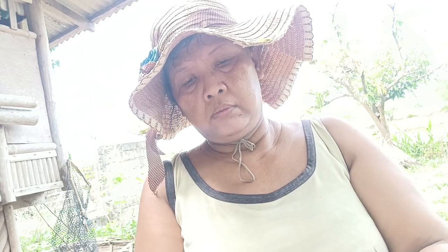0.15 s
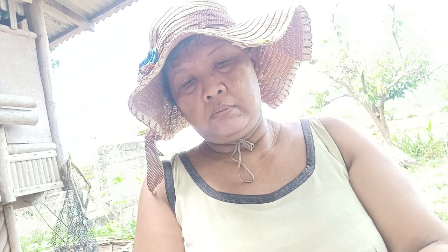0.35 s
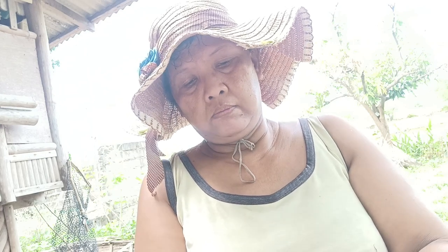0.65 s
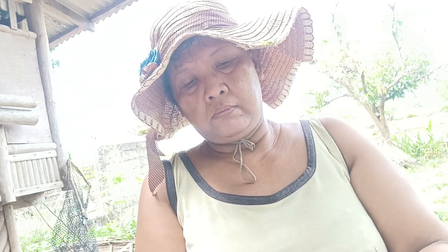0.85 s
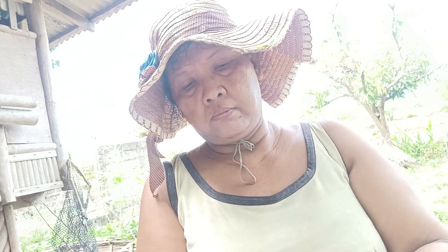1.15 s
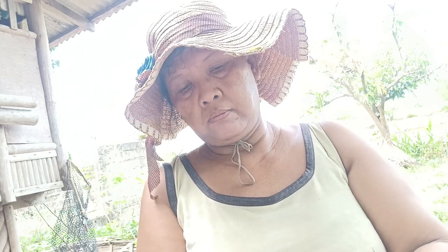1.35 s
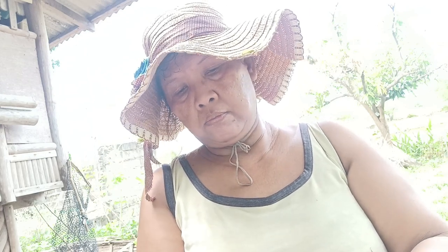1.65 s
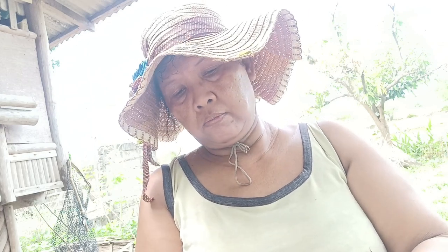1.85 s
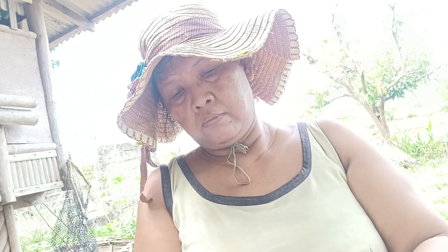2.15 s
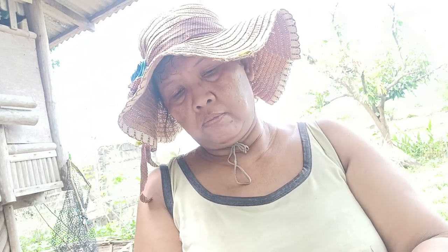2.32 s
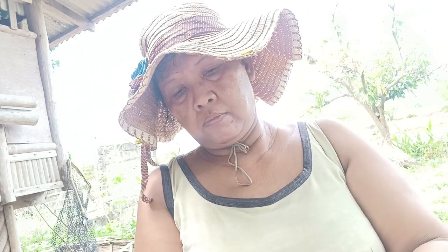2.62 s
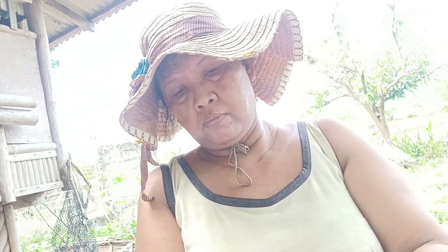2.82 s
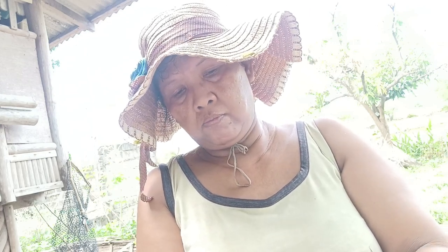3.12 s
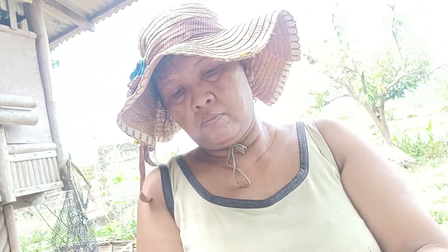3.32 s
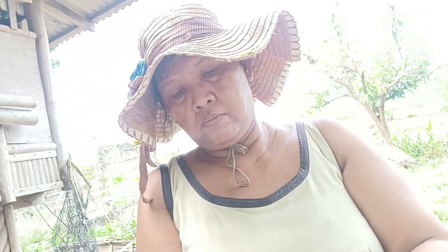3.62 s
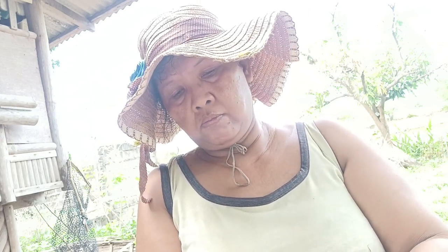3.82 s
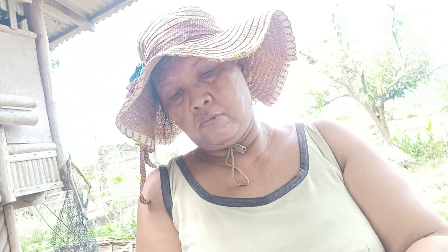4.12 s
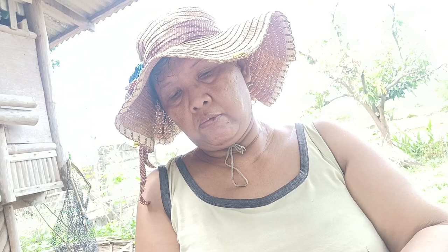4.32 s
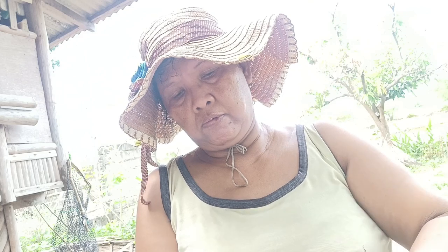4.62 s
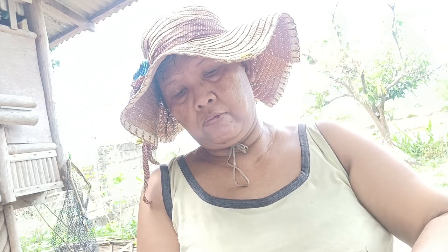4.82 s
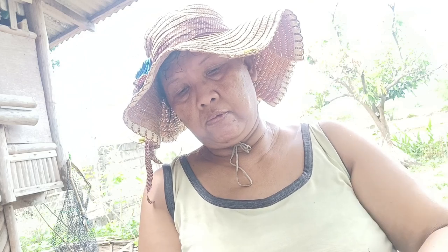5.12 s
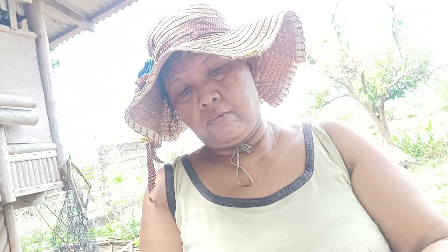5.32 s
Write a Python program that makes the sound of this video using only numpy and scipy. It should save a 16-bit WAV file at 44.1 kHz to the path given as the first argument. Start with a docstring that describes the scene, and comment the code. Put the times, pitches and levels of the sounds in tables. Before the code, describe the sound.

Brittle husk cracks and rustles in irregular bursts over soft handling thumps and small bird chirps, then a motor-like drone sets in.

```python
"""Picking apart a dry seed pod

Close to a hand-held phone, under a porch roof, a dry husk snaps, crackles and rustles: bursts of noise ring
three resonant voices, the hollow body, the cracking wall and its fine splinters. The arms jostle the phone in
bass noise, small birds call in gliding sines over the faint air and rough tones of the garden, and near the
end a low throbbing hum, like a motor, sets in: a wavering sine under a band of rough noise."""
import sys
import numpy as np
from scipy import signal
from scipy.fft import rfft, irfft, next_fast_len
from scipy.io import wavfile
from scipy.ndimage import uniform_filter1d, map_coordinates

SR = 44100
rng = np.random.default_rng(int(sys.argv[2]) if len(sys.argv) > 2 else 0)


def to_wav(sig):
    """Store sig (one row per channel, or 1-D mono) as 16-bit WAV at the path in sys.argv[1].

    Samples outside -1..1 are clipped; the rate is SR.
    """
    pcm = np.clip(np.atleast_2d(sig), -1, 1) * 32767
    pcm = np.round(pcm).astype(np.int16)
    wavfile.write(sys.argv[1], SR, pcm.T)  # frames by channels


N = 240653

# Spectra of the three voices of the husk: hollow body, cracking wall, fine splinters.
# Each row: frequency in Hz, relative level in dB.
BODY_SPECTRUM = [(100, -40), (400, -29.5), (1100, -28), (1500, -22), (1720, -1), (2000, 6.5), (2400, 4.5),
                 (3200, -1), (4500, -6), (8000, -91.5)]
CRACK_SPECTRUM = [(300, -84), (1450, -28), (1800, -10), (2600, -10.5), (3400, 4), (4300, 1.5), (5200, 8.5),
                  (6500, 0.5), (8000, -8.5), (11000, -33.5)]
SPLINTER_SPECTRUM = [(500, -108), (5000, -19.5), (8000, -7.5), (9800, 4.5), (12000, 8), (13500, 4),
                     (15300, -0.5), (17000, -15)]


def amp(db):
    """Decibels to an amplitude ratio: 20 dB is a factor of ten."""
    return 10 ** (np.asarray(db) / 20)


def unit(x):
    """Normalization to a root mean square of 1."""
    return x / np.sqrt(np.mean(x ** 2) + 1e-20)


def along(points, hz):
    """Interpolation of (Hz, value) points on a logarithmic frequency axis."""
    f, v = np.transpose(points)
    return np.interp(np.log(hz + 1), np.log(f + 1), v)


def curves(rows):
    """Linear interpolation in time: one value per sample for each column after the time."""
    s, *cols = np.transpose(rows)
    return [np.interp(np.arange(N) / SR, s, c) for c in cols]


def wobble(rate, size=N):
    """Band-limited randomness: a smooth curve through random knots, rate of them a second."""
    knots = rng.standard_normal(int(size * rate / SR) + 4)
    return map_coordinates(knots, [np.arange(size) * rate / SR])


def filtered(x, response):
    """Linear filtering: the spectrum of x times a response of frequency."""
    m = next_fast_len(N + SR // 2)
    return irfft(rfft(x, m) * response(np.fft.rfftfreq(m, 1 / SR)), m)[..., :N]


def causal(spectrum, ripple_db=0, size=1024):
    """Minimum phase: an impulse response of this colour, with random resonances and energy 1."""
    hz = np.fft.rfftfreq(size, 1 / SR)
    ripple = map_coordinates(rng.standard_normal(size), [hz / 330])  # one knot every 330 Hz
    cepstrum = irfft(np.log(amp(along(spectrum, hz) + ripple_db * ripple)))
    # folding the cepstrum onto positive times puts the energy as early as it can be
    cepstrum[1:size // 2] *= 2
    cepstrum[size // 2 + 1:] = 0
    h = irfft(np.exp(rfft(cepstrum)))
    return h / np.linalg.norm(h)


def pair(size, apart):
    """Partial coherence: noise at two microphones; apart is the share they do not have in common."""
    common, left, right = rng.standard_normal((3, size))
    return np.sqrt(1 - apart) * common + np.sqrt(apart) * np.array([left, right])


def noise(spectrum, apart):
    """Spectral shaping: coloured stereo noise of rms 1."""
    return unit(filtered(pair(N, apart), lambda hz: amp(along(spectrum, hz))))


def panned(db):
    """Level difference between the microphones: left minus right in dB."""
    return amp([[db / 2], [-db / 2]])


def add(track, s, x):
    """Superposition: mix x into track from time s in seconds."""
    i = max(round(s * SR), 0)
    part = track[:, i:i + x.shape[-1]]
    part += x[..., :part.shape[1]]


def heard(voice, ripple_db):
    """Transfer paths: one voice as it reaches the two microphones, each with its own resonances."""
    return np.array([causal(voice, ripple_db), causal(voice, ripple_db)])


def snaps(spike_db=10, spike_s=0.00036, click_db=2, lead_db=-9, lead_s=0.002, spread_s=.00005,
          ripple_db=3, crumble_t60_s=.024, size=2048):
    """Brittle fracture: fibres give way, the wall breaks in a sharp burst, the edges crumble for a few ms."""
    # Fractures of the husk. Each row: time in seconds, then relative levels of body, crack and splinters in dB.
    fractures = [(0.3547, -37, -46.5, -35), (0.362, -25.5, -15.5, -18), (0.3977, -52.5, -39, -33),
                 (0.4271, -23.5, -16.5, -20.5), (0.4322, -27.5, -16, -13.5), (0.4664, -37, -25, -27),
                 (0.6145, -21, -20, -32), (0.6355, -32, -37, -29), (0.6532, -51.5, -29, -28),
                 (0.6819, -36.5, -30, -12.5), (0.9734, -24, -28, -44), (1.0626, -44, -23.5, -21.5),
                 (1.1, -38.5, -30.5, -19.5), (1.3496, -38.5, -37, -27.5), (1.6227, -53, -27.5, -24.5),
                 (1.8899, -34.5, -34.5, -32.5), (1.944, -49.5, -47, -32), (1.9846, -42, -54, -22),
                 (1.9879, -60, -23.5, -17.5), (2.042, -41, -51, -30.5), (2.0878, -29.5, -40, -28),
                 (2.1313, -27, -23, -25), (2.51, -63, -39.5, -35), (2.7682, -40.5, -63, -25.5),
                 (2.775, -52.5, -33.5, -29.5), (2.8087, -43, -33.5, -40.5), (2.9158, -37, -27, -22.5),
                 (2.922, -48.5, -31, -16.5), (2.9384, -32.5, -37, -32.5), (2.9448, -29.5, -59, -35.5),
                 (2.9618, -47, -41, -25.5), (2.9867, -30, -22.5, -24), (3.0058, -40, -35.5, -35),
                 (3.032, -74, -29.5, -26.5), (3.0872, -25.5, -15.5, -16), (3.1487, -58.5, -31.5, -22),
                 (3.233, -66, -44, -24), (3.8477, -40, -42, -54), (4.3609, -15, -17, -21.5),
                 (4.519, -27.5, -33, -72), (4.551, -18, -22, -30.5), (4.5539, -22, -16.5, -22),
                 (4.561, -17.5, -22.5, -29), (4.684, -35, -29.5, -48), (4.7352, -17.5, -20.5, -27),
                 (4.746, -19.5, -23.5, -33), (4.917, -15, -18, -27.5), (4.9205, -19.5, -24.5, -37),
                 (4.929, -20.5, -28, -25.5), (5.0249, -29.5, -36, -49)]
    body_peak_hz = 1860
    out, lead = np.zeros((2, N)), size // 4
    t = (np.arange(size) - lead) / SR
    core = (t > -.001) & (t < .002)  # the span over which the levels hold
    hz = np.fft.rfftfreq(size, 1 / SR)
    giving_way = amp(lead_db) * np.exp(-np.abs(t) / lead_s)
    crumble = np.where(t < 0, giving_way, amp(-60 * np.abs(t) / crumble_t60_s))
    spike = np.exp(-(t / spike_s - 1) ** 2)
    for s, *levels in fractures:
        # bright splinters part cleanly, deep breaks crunch
        sharpness_db = spike_db + 0.53 * (levels[-1] - levels[0])
        force = (crumble + amp(sharpness_db) * spike) * pair(size, apart=0.41)
        # the place of the break sets which microphone hears it first, and which resonances ring
        delay = rng.normal(1, 1) * spread_s * np.array([[-.5], [.5]])
        force = rfft(force) * np.exp(-2j * np.pi * hz * delay)
        # a heavy break sets more of the pod moving, so its body rings down to a lower edge
        lower = np.interp(levels[0], [-32, -22], [1, .77])
        body = [(f * lower if f < body_peak_hz else f, db) for f, db in BODY_SPECTRUM]
        voices = body, CRACK_SPECTRUM, SPLINTER_SPECTRUM
        rings = [irfft(force * rfft(heard(voice, ripple_db), size)) for voice in voices]
        snap = sum(amp(db) * r / np.sqrt(np.mean(r[:, core] ** 2)) for db, r in zip(levels, rings))
        # the sharpest snaps overload the phone: one bare click reaching down into the bass,
        # as strong as the splinters are loud and so faint in the duller snaps
        snap[:, lead] += amp(levels[-1] + click_db)
        add(out, s - lead / SR, snap)
    return out


def ringing(x, t60=0.22, width_hz=130):
    """Cavity resonance: the hollow pod rings on in a few blurred modes."""
    # Modes that ring on after a break. Each row: frequency in Hz, relative level in dB.
    modes = [(2110, 6), (2400, 4), (3220, 3), (3540, -13.5)]
    t = np.arange(SR // 2) / SR
    ring = 0
    for hz, db in modes:
        ring = ring + amp(db) * wobble(width_hz, size=len(t)) * np.sin(2 * np.pi * hz * t)
    ring = ring * amp(-60 * t / t60)
    return signal.fftconvolve(x, ring[None] / np.linalg.norm(ring), axes=1)[:, :N]


def stroke(peak_s, length, rise_share=0.52, ends_db=22):
    """Amplitude envelope of one movement: it swells to its peak and fades to ends ends_db below it."""
    u = (np.arange(N) / SR - peak_s) / length
    near, gain = np.abs(u) < 2, np.zeros(N)
    from_peak = np.maximum(-u[near] / rise_share, u[near] / (1 - rise_share))
    gain[near] = amp(-ends_db * from_peak ** 1.57)
    return gain


def tear(start_s, attack_s=0.012, decay_db_per_s=220.5):
    """Exponential decay: the gain of one tear, with a sudden start and a steady fall in dB."""
    t, gain = np.arange(SR // 2) / SR, np.zeros((1, N))
    add(gain, start_s - attack_s, np.minimum(t / attack_s, 1) * amp(-decay_db_per_s * t))
    return gain[0]


def handling():
    """Addition of powers: how hard all strokes and tears drive the body, the wall and the splinters."""
    # Strokes of the fingers over the husk. Each row: time of the peak in seconds, length in seconds,
    # relative level in dB, brightness in dB (splinters up, body down).
    finger_strokes = [(0.18, 0.14, -37, 2.5), (0.356, 0.24, -50, 11), (0.669, 0.53, -64.5, 19.5),
                      (0.919, 0.33, -50.5, 3.5), (1.17, 0.22, -36.5, 0.5), (1.185, 0.06, -31.5, -1),
                      (1.416, 0.18, -42.5, 0.5), (1.905, 0.098, -48.5, -8.5), (1.993, 0.16, -39, 3.5),
                      (2.083, 0.073, -32.5, 0.5), (2.136, 0.09, -33, -5), (2.344, 0.15, -44, -2),
                      (2.62, 0.28, -54.5, 1), (2.831, 0.19, -38, 3.5), (2.963, 0.17, -33.5, 2),
                      (3.058, 0.21, -50.5, 10), (3.18, 0.3, -56.5, 9.5), (3.42, 0.16, -46, 7.5),
                      (3.557, 0.1, -42, 0.5), (3.635, 0.19, -42.5, -5.5), (3.901, 0.14, -51, -5.5),
                      (4.184, 0.16, -45.5, 1.5), (4.346, 0.037, -40.5, -7), (4.534, 0.035, -42.5, -12.5),
                      (4.69, 0.054, -40.5, -8.5), (4.863, 0.069, -42, -7.5), (5.444, 0.042, -38, -3)]
    # The husk tears on after a break. Each row: time in seconds, relative level in dB, brightness in dB.
    husk_tears = [(0.43, -30.5, 3), (1.07, -39, 4), (1.623, -35.5, 1), (2.769, -42.5, 2),
                  (4.365, -27, -6.5), (4.555, -30, -5), (4.734, -36.5, -5), (4.92, -33.5, -8.5)]
    moves = [(stroke(s, length), db, bright_db) for s, length, db, bright_db in finger_strokes]
    moves += [(tear(s), db, bright_db) for s, db, bright_db in husk_tears]
    gains = np.array([gain for gain, _, _ in moves])
    shares = np.array([amp([db - bright_db, db, db + bright_db]) for _, db, bright_db in moves])
    return np.sqrt(shares.T ** 2 @ gains ** 2)


def rustle(scatter_db=-1.0, clump_db=2, body_db=-1.5, crack_db=-.5, splinter_db=-1, size=6144):
    """Stick-slip friction: tiny slips of husk on husk over a smooth rub; each new grip rings other resonances."""
    slips_per_s, ticks_per_s, tick_db, rub_share = 500, 70, 27, .45
    slips = (rng.random(N) < slips_per_s / SR) * amp(scatter_db * np.minimum(rng.standard_normal(N), 2))
    # the energy of a slip decays with a time constant of 0.4 ms
    slip_energy = signal.lfilter([1], [1, -np.exp(-1 / (.0004 * SR))], slips ** 2)
    grit = np.sqrt(np.abs(slip_energy))
    pressure = (unit(grit) + rub_share) * amp(clump_db * wobble(rate=98))
    fibres = rng.random(N) < ticks_per_s / SR
    out = np.zeros((2, N))
    voices = ((BODY_SPECTRUM, body_db, .45), (CRACK_SPECTRUM, crack_db, .7),
              (SPLINTER_SPECTRUM, splinter_db, .8))
    for drive, (voice, db, apart) in zip(handling(), voices):
        # now and then a single fibre snaps with a clean tick, each in its own mix of the three voices
        ticks = fibres * amp(tick_db) * np.tanh(rng.standard_normal(N))
        force = np.pad(pressure * pair(N, apart) + ticks, ((0, 0), (0, size)))
        grains = np.zeros((2, N))
        # half-overlapping windows fade from grip to grip
        for i in range(0, N, size // 2):
            grip = heard(voice, ripple_db=5.5)
            windowed = force[:, i:i + size] * np.hanning(size)
            add(grains, i / SR, signal.fftconvolve(windowed, grip, axes=1))
        out += amp(db) * drive * unit(grains)
    return out * panned(db=-3.0)


def knocks(t60=0.19, q=5.7):
    """Damped resonance: a soft contact and a brief roll ring one mode of the hollow pod."""
    # Soft knocks of the pod and its loose seeds. Each row: time in seconds, frequency in Hz, relative level in dB.
    contacts = [(0.427, 414, -46), (2.012, 614, -56.5), (3.824, 2580, -36.5), (3.893, 1865, -39.5),
                (3.968, 1990, -42.5), (4.04, 1890, -38.5), (4.111, 1910, -43), (4.149, 1920, -36),
                (4.174, 2085, -33), (4.17, 587, -49.5), (4.172, 1110, -49.5)]
    out, t = np.zeros((2, N)), np.arange(SR // 8) / SR
    for s, hz, db in contacts:
        ring = np.sin(2 * np.pi * hz * t) * t * np.exp(-np.pi * hz / q * t)
        roll = unit(signal.fftconvolve(pair(len(t), apart=0.55), ring[None], axes=1)[:, :len(t)])
        add(out, s, roll * amp(db - 60 * t / t60))
    return out * panned(db=-3.5)


def rumble(tremor_db=-52):
    """Structure-borne noise: soft shifts of the arm shake the phone, over the slight tremor of the hand."""
    # Shifts of the arm. Each row: time of the peak in seconds, length in seconds, relative level in dB.
    jostles = [(0.577, 0.057, -39), (0.863, 0.21, -42.5), (0.97, 0.24, -36), (1.721, 0.16, -42),
               (1.903, 0.18, -38), (2.245, 0.16, -37.5), (2.492, 0.55, -38), (3.357, 0.7, -41),
               (3.505, 0.62, -36.5), (3.84, 0.27, -40), (4.221, 0.2, -36)]
    # Spectrum of the shaking. Each row: frequency in Hz, relative level in dB per Hz.
    thud = [(20, -30.5), (45, -11), (68, -1), (120, -7.5), (170, -16), (230, -34), (400, -42.5),
            (900, -101)]
    shift_power = sum((amp(db) * stroke(s, length)) ** 2 for s, length, db in jostles)
    shake = np.sqrt(amp(tremor_db) ** 2 + shift_power)
    return shake * noise(thud, apart=0.029) * panned(db=-1.4)


def patchy(x, depth_db, size=512):
    """Time-frequency modulation: random patches of gain, some 260 Hz wide and a tenth of a second long."""
    z = signal.stft(x, nperseg=size)[2]
    field = uniform_filter1d(rng.standard_normal(z.shape[1:]), size=3, axis=0)
    field = uniform_filter1d(field, size=20, axis=1)
    return unit(signal.istft(z * amp(depth_db * unit(field)), nperseg=size)[1][:, :N])


def hum(pitch_hz=92, waver=0.016):
    """Amplitude modulation: a low motor-like drone throbs, with a rough, uneven band above it that grows."""
    # Spectrum of the rough band. Each row: frequency in Hz, relative level in dB per Hz.
    growl = [(60, -5), (90, 9), (115, 13.5), (160, 8), (200, -3.5), (260, -37), (450, -20), (620, -22),
             (800, -15.5), (1080, -16), (1350, -7.5), (1680, -15.5), (2500, -22.5), (3500, -17),
             (4500, -27.5), (7000, -74.5)]
    start_s, rise_s, note_db = 4.45, 0.069, -34
    throb_at_s, throb_period_s, swell_db, beat_db = 4.885, 0.263, 3, 5.5
    s = np.arange(N) / SR
    phase = 2 * np.pi * np.cumsum(pitch_hz * (1 + waver * wobble(rate=47))) / SR
    # one swell and three beats a period: two strong beats and a weaker one
    turn = 2 * np.pi * (s - throb_at_s) / throb_period_s
    throb_db = swell_db * np.cos(turn) - beat_db * np.cos(3 * turn)
    note = amp(note_db + throb_db) * unit(np.sin(phase) * amp(1.5 * wobble(rate=40)))
    rough = patchy(noise(growl, apart=0.3) * (1 + .5 * np.cos(phase)), depth_db=4.5)
    rough_db = np.interp(s, [4.5, 4.9, 5.25], [-45, -41, -38])
    onset = np.clip((s - start_s) / rise_s, 0, 1)
    return onset * (note + amp(rough_db) * rough) * panned(db=-1.0)


def birds(blur_hz=180, chirp_s=0.056, arch_octaves=0.08, whistle_db=-50):
    """Frequency modulation: arched chirps and one high whistle that rises, then falls, all with a fast flutter."""
    # Chirps of small birds. Each row: time in seconds, pitch in Hz, glide in octaves, relative level in dB.
    chirps = [(0.733, 2980, 0.17, -58.5), (1.229, 2944, 0.21, -55), (1.488, 2900, 0.16, -59),
              (1.689, 3100, -0.17, -55), (1.796, 2950, 0.14, -53.5), (2.179, 2935, 0.18, -50.5),
              (2.378, 2814, 0.1, -55.5), (2.526, 2840, 0.164, -55.5), (2.645, 3010, 0.18, -56),
              (2.466, 5000, 0.12, -51.5)]
    # Pitch of the whistle. Each row: time in seconds, pitch in Hz.
    whistle = [(2.289, 5250), (2.374, 6200), (2.409, 5860), (2.478, 4400)]
    out, flutter = np.zeros((2, N)), wobble(rate=770)
    u = np.linspace(-.5, .5, int(chirp_s * SR))
    notes = [(s, hz * 2 ** (glide * u - arch_octaves * (2 * u) ** 2), db) for s, hz, glide, db in chirps]
    start, end = whistle[0][0], whistle[-1][0]
    notes.append((start, curves(whistle)[0][int(start * SR):int(end * SR)], whistle_db))
    for s, hz, db in notes:
        pitch = hz + blur_hz * flutter[int(s * SR):][:len(hz)]
        swell = np.sqrt(np.abs(np.sin(np.linspace(0, np.pi, len(hz)))))
        add(out, s, 2 * amp(db) * swell * np.sin(2 * np.pi * np.cumsum(pitch) / SR))
    return out


def far_tones(width_hz=50):
    """Narrow-band noise: faint rough tones swell and fade far off."""
    # Rough tones of the surroundings. Each row: start in seconds, end in seconds, frequency in Hz, level in dB.
    tones = [(0, 1.09, 157.6, -52.5), (2.67, 2.898, 161.5, -46.5), (0.096, 0.226, 610, -61),
             (2.71, 2.75, 900, -56.5), (4.044, 4.15, 316.2, -56), (4.938, 5.313, 610, -51.5),
             (5.224, 5.59, 1061, -55.5), (5.279, 5.363, 3570, -58), (5.33, 5.552, 1640, -57)]
    out = np.zeros((2, N))
    for start, end, hz, db in tones:
        t = np.arange(int((end - start) * SR) + 2) / SR
        swell = np.sqrt(np.abs(np.sin(np.pi * t / t[-1])))
        width = min(width_hz, hz / 10)
        # two random quadratures spread the tone into a band
        tone = wobble(width, size=len(t)) * np.sin(2 * np.pi * hz * t)
        tone += wobble(width, size=len(t)) * np.cos(2 * np.pi * hz * t)
        add(out, start, amp(db) * swell * unit(tone))
    return out


def air():
    """Stationary random noise: the steady, coloured bed of the garden."""
    # Spectrum of the air. Each row: frequency in Hz, relative level in dB per Hz.
    air_spectrum = [(30, -32), (100, -21), (170, 8.5), (240, -7.5), (400, -14), (800, -21), (1500, -21.5),
                    (2800, -19.5), (4300, -27), (6000, -25), (8500, -25.5), (15000, -39.5)]
    return amp(-53) * noise(air_spectrum, apart=0.53)


def porch(x, gap_s=0.0088):
    """Reverberation: roof and wall answer with a short diffuse tail."""
    # Decay under the porch. Each row: frequency in Hz, time to fall by 60 dB in seconds.
    decay = [(200, 0.143), (2000, 0.18), (6000, 0.1), (14000, 0.06)]
    hz, t, z = signal.stft(rng.standard_normal((2, SR // 2)), SR, nperseg=256)
    tail = signal.istft(z * amp(-60 * t / along(decay, hz)[:, None]), SR, nperseg=256)[1]
    tail = np.pad(tail / np.linalg.norm(tail[0]), ((0, 0), (int(gap_s * SR), 0)))
    return signal.fftconvolve(x, tail, axes=1)[:, :N]


def scene():
    """Superposition: the pod close by, the garden behind it, and the bass of hand and hum."""
    # The pod at the two microphones. Each row: frequency in Hz, left minus right in dB.
    lean = [(400, 5), (1000, -4.5), (2200, -3), (5000, 4.5), (8000, -5.5), (13000, -0.5)]
    cracks = snaps()
    calls = birds()
    pod = cracks + rustle() + amp(-12.5) * porch(cracks) + amp(-27.5) * ringing(cracks) + knocks()
    pod = filtered(pod, lambda hz: amp(along(lean, hz) * np.array([[.5], [-.5]])))
    garden = amp(-0.5) * calls + amp(-2.5) * porch(calls) + far_tones() + air()
    return pod + garden + rumble() + hum()


def record(dry, overload=0.8, top_hz=16200):
    """Saturation and band limiting: the hardest snaps overload the phone, and nothing above top_hz is kept."""
    held = dry / (1 + (dry / overload) ** 4) ** .25  # peaks bend smoothly towards the overload level
    return filtered(held, lambda hz: hz < top_hz)


dry = scene()
out = record(dry)
to_wav(out)
```